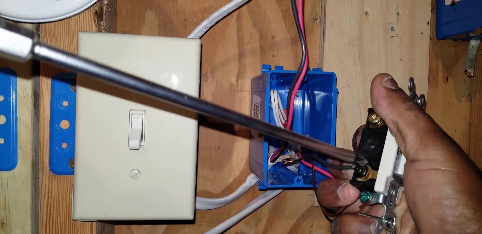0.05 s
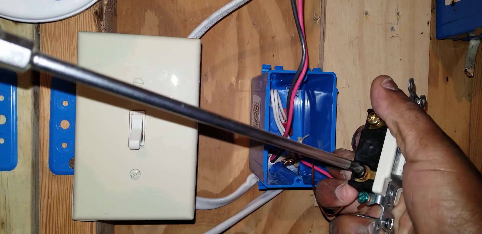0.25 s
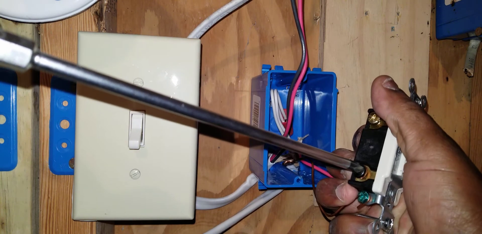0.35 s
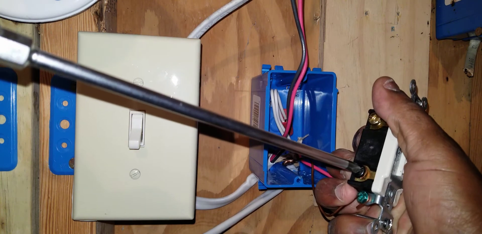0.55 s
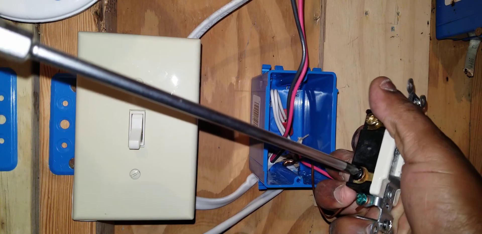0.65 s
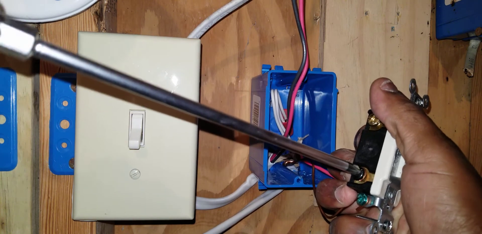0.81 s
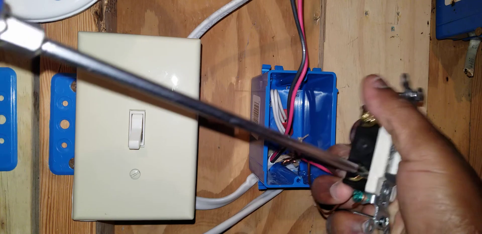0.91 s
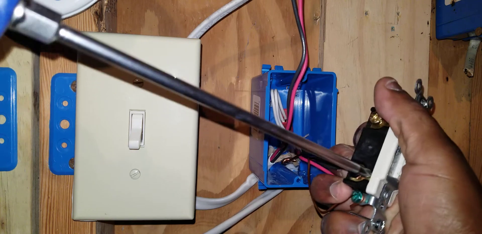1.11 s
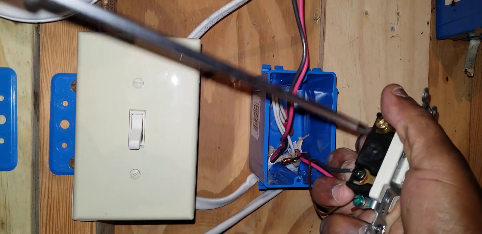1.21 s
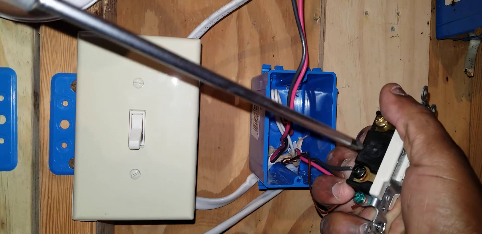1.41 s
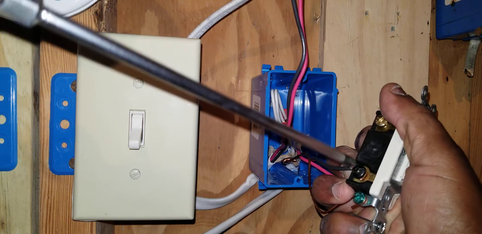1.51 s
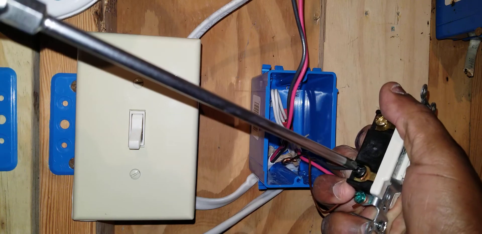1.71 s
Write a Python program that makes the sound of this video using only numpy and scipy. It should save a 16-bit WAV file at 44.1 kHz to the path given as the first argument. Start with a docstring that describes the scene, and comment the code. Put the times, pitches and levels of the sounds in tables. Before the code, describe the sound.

A screwdriver ticks lightly on a wire and a switch's terminal screw, close and slightly left, from about 0.2 seconds. Fingers slide faintly on plastic around 0.7. At 0.9 the tip slips off with one loud clack and a soft thud. Small ticks and a brief wire scrape follow until 1.2, then a light tap at 1.5. A low machine hum fills the small room throughout.

```python
"""A small, fairly live room with a machine humming low. Close to the microphone, a little to the left,
a screwdriver works a wire loop under the terminal screw of a hand-held wall switch. Tip, wire and screw
tick lightly, setting switch and shaft ringing, and fingers slide on the plastic. The tip slips off in
one loud clack with a thud; the wire scrapes and the tip taps down again."""
import sys
import numpy as np
from scipy import signal
from scipy.fft import rfft, irfft, next_fast_len
from scipy.io import wavfile
from scipy.ndimage import map_coordinates

SR = 44100
rng = np.random.default_rng(int(sys.argv[2]) if len(sys.argv) > 2 else 0)


def unload_wav(signal):
    """Save mono or channel-first audio to the path in sys.argv[1] as 16-bit WAV at rate SR, clipped to [-1, 1]."""
    wavfile.write(
        sys.argv[1],
        SR,
        np.round(np.clip(np.atleast_2d(signal).T, -1, 1) * 32767).astype(np.int16),
    )


N = 77175

# The machine's hum. Each row: multiple of the shaft rate, rms level in dB.
HUM_HARMONICS = [(2, -46), (3, -50.5), (4, -49), (5, -47.5), (6, -60.5), (7, -58.5)]
# Rumble and hiss behind it. Each row: frequency in Hz, relative level in dB.
RUMBLE_COLOUR = [(15, -31), (30, -16), (46, -2), (62, -2), (95, 1.5), (135, -5), (200, -14), (260, -15),
                 (400, -24.5), (600, -30), (1000, -54.5), (2000, -64)]
HISS_COLOUR = [(300, 0), (1000, 0.5), (1500, -3), (2300, 6), (3000, -9.5), (3600, -2.5), (4300, -15),
               (5100, 2.5), (6300, -9), (8500, -27), (12000, -6), (16000, -9)]
# Hands shifting on the switch. Each row: time in seconds, level in dB.
HANDLING_LEVELS = [(0, -69), (.2, -60.5), (.55, -60.5), (.85, -58), (1.1, -65.5), (1.301, -84), (1.75, -67)]
# Their dull rustle. Each row: frequency in Hz, relative level in dB.
HANDLING_COLOUR = [(80, -15), (180, -0.5), (330, -1.5), (450, -8.5), (600, -6.5), (1000, -24),
                   (2500, -28.5), (6000, -55)]
# Tip, wire and screw touching. Each row: start in seconds, time in contact in seconds, relative level
# in dB in each of five bands, left over right in dB, room send in dB.
CONTACTS = [ (0.1894, 0.0035, -50.5, -47.5, -43.5, -57, -62, 7.5, 6.5),
            (.1995, 0.006, -54, -51.5, -73, -56.5, -61.5, -10, 9.5),
            (0.3434, 0.0031, -72, -62, -53.5, -65.5, -66, 3.5, 6),
            (.357, 0.0017, -58.5, -58, -78, -77, -80, -4, 7),
            (0.3758, 0.0054, -51.5, -46, -45, -49.5, -53, 6.5, 7.5),
            (0.406, 0.0018, -49, -41, -35, -42.5, -37, -1, -1),
            (0.52, 0.0032, -66, -64, -49.5, -66.5, -69, 1.5, 4),
            (0.6262, 0.00042, -62.5, -73.5, -63.5, -76, -64, 2, 3),
            (0.6322, 0.002, -56.5, -65, -59, -59, -59.5, 2, 11),
            (.731, 0.0044, -49.5, -63, -67, -69.5, -72, 1, 6),
            (0.8046, .001, -43, -49, -54, -62, -67, 6, -3),
            (.873, .001, -37.5, -27.5, -41.5, -50.5, -52.5, 1.5, -0.5),
            (0.8744, .0022, -23, -22.5, -26, -28.5, -30, -0.5, -0.5),
            (.8813, 0.00097, -23, -17.5, -25.5, -33, -34.5, 2, -1),
            (0.8858, .002, -26.5, -21, -28.5, -26, -26.5, 0, -1),
            (.8935, 0.0017, -45.5, -51, -46, -32.5, -36, -7.5, 1),
            (0.897, .0015, -37, -51, -38.5, -38, -34, 1, 3),
            (.975, 0.0018, -63.5, -50, -59, -51, -51.5, -4.5, -5),
            (1.0133, 0.0016, -76, -69, -45.5, -48, -46.5, -5.5, -5),
            (1.1122, 0.0017, -54, -62, -57, -58, -59.5, -6, 0),
            (1.119, 0.0025, -67, -55, -56, -64, -64, 7.5, 0),
            (1.147, 0.0016, -51, -48, -37, -45.5, -44.5, 2, -2.5),
            (1.5324, 0.00086, -48, -36, -53, -58, -68.5, -1, 3.5)]
# The edges of those five bands, in Hz.
BAND_EDGES = [400, 1000, 2600, 5000, 9000, 16000]
# Switch and screwdriver shaft ringing. Each row: frequency in Hz, relative level in dB, T60 in seconds.
SWITCH_MODES = [(653, -4, 0.025), (886, -8, 0.02), (1356, -2, 0.017), (1554, -12.5, 0.026),
                (1940, -10.5, 0.017), (2101, 2, 0.017), (3162, 4.5, 0.022), (3700, -9, .012),
                (5780, 1, .018), (6100, -1.5, 0.015), (7340, -0.5, 0.026), (9970, -5, .008),
                (11600, -2, .01), (13000, -4, .007)]
# The gritty crack of a contact. Each row: frequency in Hz, relative level in dB.
CRACK_COLOUR = [(300, -8), (650, -1.5), (1100, -12), (1500, 0), (2400, 0.5), (2800, 0), (3400, 6),
                (4100, 2), (4800, -4), (6000, 0), (8700, -5), (11000, -3), (16000, -10)]
# Wire and tip rubbing the screw. Each row: start, time the fade runs from and end in seconds,
# relative level in dB. The slip's scrape is already fading when it starts.
SCRAPES = [(0.312, 0.352, 0.41, -58.5), (.505, 0.514, 0.62, -60), (0.873, 0.872, .905, -27),
           (1.117, 1.135, 1.224, -43.5)]
# Metal scraping, then the fingers' rub and swish. Each row: frequency in Hz, relative level in dB.
SCRAPE_COLOUR = [(200, -16.5), (600, 6.5), (1000, -8.5), (2000, 5), (3400, 3), (4700, -15.5), (6200, 4),
                 (9000, -27.5), (12000, -7.5), (16000, -23.5)]
RUB_COLOUR = [(200, -3.5), (500, 9), (850, 8.5), (1300, 1.5), (2200, 0), (3000, -3.5), (4500, -1.5),
              (5700, -1.5), (7000, -9), (10000, -6.5), (16000, -12)]
SWISH_COLOUR = [(3000, -24.5), (5700, -7), (7000, -13), (10500, -11), (13400, -0.5), (14500, 0.5),
                (16000, -6)]
# Low modes of hand, box and wall. Each row: frequency in Hz, relative level in dB, T60 in seconds.
THUD_MODES = [(53.4, -25, .3), (112, -29.5, 0.29), (159.4, -22, 0.15), (181.4, -32, .8),
              (256.4, -16.5, 0.061), (440, -34, .02), (664, -23, 0.025), (872, -26.5, 0.056)]
# The room's decay. Each row: frequency in Hz, T60 in seconds.
ROOM_T60 = [(150, 0.76), (600, 0.36), (2000, 0.34), (6000, 0.42), (15000, 0.34)]
# The tone of its reflections. Each row: frequency in Hz, gain in dB.
ROOM_COLOUR = [(100, -24.5), (400, 9.5), (700, 1), (2000, -4), (4000, -2.5), (8000, -1), (15000, -1)]
# Balance of close sounds at the microphone. Each row: frequency in Hz, left over right in dB.
MIC_BALANCE = [(100, 6.5), (700, -3), (1800, 8.5), (3500, -1.5), (7000, 5), (12000, 12)]
# Their earlier arrival on the left. Each row: frequency in Hz, lead in seconds.
LEFT_LEAD = [(400, 0.000082), (700, 0.00027), (1500, 0.000518), (16000, .0005)]


def amp(db):
    return 10 ** (np.asarray(db) / 20)


def unit_rms(x):
    return x / np.sqrt(np.mean(x ** 2) + 1e-20)


def along(points, hz):
    """Interpolate (Hz, value) points on a log frequency axis."""
    knots_hz, values = np.transpose(points)
    return np.interp(np.log(hz + 1), np.log(knots_hz + 1), values)


def clock():
    return np.arange(N) / SR


def wobble(rate):
    """A smooth random curve, rate knots a second."""
    return map_coordinates(rng.standard_normal(int(N * rate / SR) + 4), [clock() * rate])


def filtered(x, response):
    """Pass x through a complex response, given as a function of Hz."""
    n = x.shape[-1]
    padded = next_fast_len(n + SR // 4)
    return irfft(rfft(x, padded) * response(np.fft.rfftfreq(padded, 1 / SR)), padded)[..., :n]


def noise(colour, side_db, size=N):
    """Coloured stereo noise of rms 1; side_db sets its width."""
    mid, side = rng.standard_normal((2, size))
    stereo = np.array([mid + amp(side_db) * side, mid - amp(side_db) * side])
    return unit_rms(filtered(stereo, lambda hz: amp(along(colour, hz))))


def band(x, lo, hi):
    """One band of x, with the energy of a 5 ms click of rms 1."""
    part = signal.sosfilt(signal.butter(5, [lo, hi], "band", fs=SR, output="sos"), x)
    return part / np.sqrt(np.sum(part ** 2, axis=1, keepdims=True) / (0.005 * SR))


def machine(shaft_hz=25.17, throb_s=0.81, waver_db=1.2, drift_rad=0.35):
    """In the background a shaft throbs once a turn: low harmonics over rumble and faint hiss."""
    turns = shaft_hz * (clock() - throb_s)
    hum = np.zeros(N)
    for multiple, db in HUM_HARMONICS:
        peak = np.sqrt(2) * amp(db + waver_db * wobble(4))
        hum += peak * np.cos(2 * np.pi * multiple * turns + drift_rad * wobble(3.3))
    rumble = amp(-44) * noise(RUMBLE_COLOUR, side_db=-12)
    hiss = amp(-69) * noise(HISS_COLOUR, side_db=1)
    return hum + rumble + hiss


def handling(rustle_db=2.5):
    """The hands rustle dully as they press on the switch."""
    level_db = np.interp(clock(), *np.transpose(HANDLING_LEVELS)) + rustle_db * wobble(25)
    return amp(level_db) * noise(HANDLING_COLOUR, side_db=-3.5)


def switch_ring(t, rise_s=0.0016, scatter_db=3.5, detune=0.014):
    """Struck switch and shaft ring in damped modes, a little different at every contact."""
    hz, db, t60 = np.transpose(SWITCH_MODES)[:, :, None]
    level, pitch, phase = rng.standard_normal((3, len(SWITCH_MODES), 1))
    decay = amp(db + scatter_db * level - 60 * t / t60)
    modes = decay * np.sin(2 * np.pi * hz * (1 + detune * pitch) * t + np.pi * phase)
    return (1 - np.exp(-t / rise_s)) * modes.sum(axis=0)


def contacts(attack_s=0.0012, release_t60_s=0.012, gain_db=-1.5):
    """Metal meets metal in a brief gritty crack plus ringing; returns close sound and room send."""
    out = np.zeros((2, 2, N + SR))
    t = np.arange(SR // 16) / SR
    for start_s, hold_s, *levels, pan_db, send_db in CONTACTS:
        force = np.minimum(t / attack_s, 1) * amp(-60 * np.maximum(t - hold_s, 0) / release_t60_s)
        crack = amp(7) * force * noise(CRACK_COLOUR, side_db=-1, size=len(t))
        ring = switch_ring(t)
        pan = amp([[pan_db / 2], [-pan_db / 2]])
        start = round(start_s * SR)
        for lo, hi, db in zip(BAND_EDGES, BAND_EDGES[1:], levels):
            ring_db = 7.5 if db == max(levels) else 0  # clearest ring in the strongest band
            close = band(crack + ring * amp(ring_db), lo, hi) * pan
            send = band(crack + ring * amp(-6.5), lo, hi) * amp(send_db)  # mostly crack
            out[..., start:start + len(t)] += amp(db + gain_db) * np.array([close, send])
    return out[..., :N]


def scrapes(range_db=36.5, grain_db=3, grain_rate=600):
    """Wire and tip scrape the screw; most scrapes swell and fade, the slip's starts abruptly and dies."""
    level = np.zeros(N)
    for *times, db in SCRAPES:
        level += amp(np.interp(clock(), times, [db - range_db, db, db - range_db], -np.inf, -np.inf))
    grain = amp(grain_db * wobble(grain_rate))
    return level * unit_rms(grain * noise(SCRAPE_COLOUR, side_db=-1))


def finger_slide(start_s, slip_s, rise_s=0.037):
    """Skin slides on plastic: an airy swish, soon gone, and a duller rub that lasts until the slip."""
    t = clock() - start_s
    rise = np.clip(t / rise_s, 0, 1) ** 2
    fading_s = np.maximum(t - rise_s, 0)
    rub = amp(-58 - 16.5 * fading_s) * (clock() < slip_s) * noise(RUB_COLOUR, side_db=0.5)
    swish = amp(-54 - 130 * fading_s) * noise(SWISH_COLOUR, side_db=-2)
    flicker = amp(1.2 * wobble(90))
    return rise * flicker * (rub + swish)


def thud(slip_s, attack_s=0.0026):
    """The slipping tip jolts the low modes of hand, box and wall."""
    t = np.maximum(clock() - slip_s, 0)
    modes = sum(amp(db - 60 * t / t60) * np.sin(2 * np.pi * hz * t) for hz, db, t60 in THUD_MODES)
    return (1 - np.exp(-t / attack_s)) * modes


def room(x, walls_t60_s=0.11, delay_s=0.004):
    """Near walls answer first, then the room rings on; each channel has its own tail."""
    hz, t, spectrum = signal.stft(rng.standard_normal((2, SR)), SR, nperseg=256)
    decay = amp(-60 * t / along(ROOM_T60, hz)[:, None])
    tail = signal.istft(spectrum * decay, SR, nperseg=256)[1][:, :SR]
    walls = rng.standard_normal((2, SR)) * amp(-60 * np.arange(SR) / SR / walls_t60_s)
    impulse = amp(-11) * tail / np.linalg.norm(tail[0]) + amp(-12) * walls / np.linalg.norm(walls[0])
    wet = signal.fftconvolve(x, impulse, axes=1)[:, :N]
    return filtered(wet, lambda f: amp(along(ROOM_COLOUR, f)) * np.exp(-2j * np.pi * f * delay_s))


def scene(slip_s=0.8795):
    """The close work reaches the microphone's left side first; the thud comes from all around."""
    clicks, click_send = contacts()
    rubs = scrapes() + finger_slide(start_s=0.683, slip_s=slip_s)
    jolt = thud(slip_s)
    sides = np.array([[0.5], [-0.5]])

    def microphone(hz):
        lead = np.exp(2j * np.pi * hz * sides * along(LEFT_LEAD, hz))
        return amp(sides * along(MIC_BALANCE, hz)) * lead

    direct = filtered(clicks + rubs, microphone) + jolt * amp(sides * 1.5)
    reflections = room(click_send + rubs + jolt * amp(-3))
    return direct + reflections + handling() + machine()


def record(dry, top_hz=16000):
    """The recorder keeps nothing above its band limit."""
    return filtered(dry, lambda hz: hz < top_hz)


dry = scene()
out = record(dry)
unload_wav(out)
```